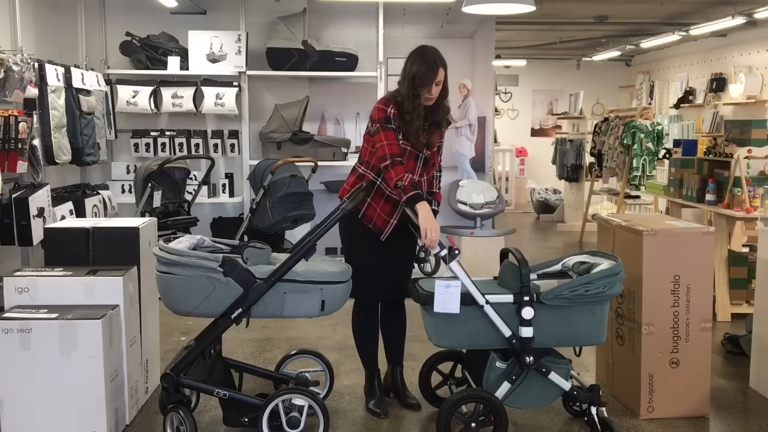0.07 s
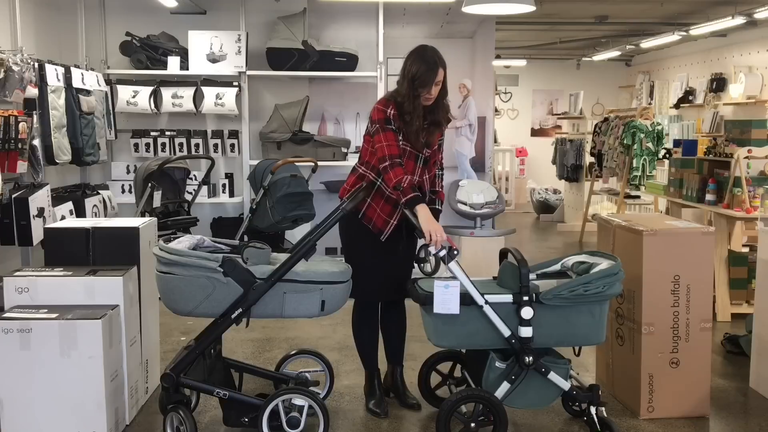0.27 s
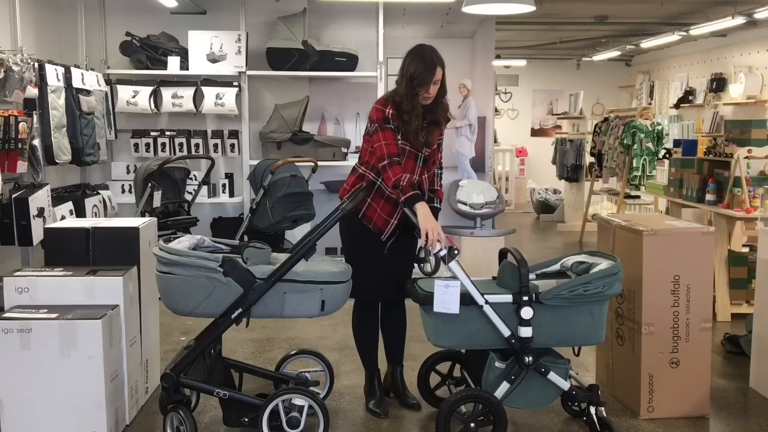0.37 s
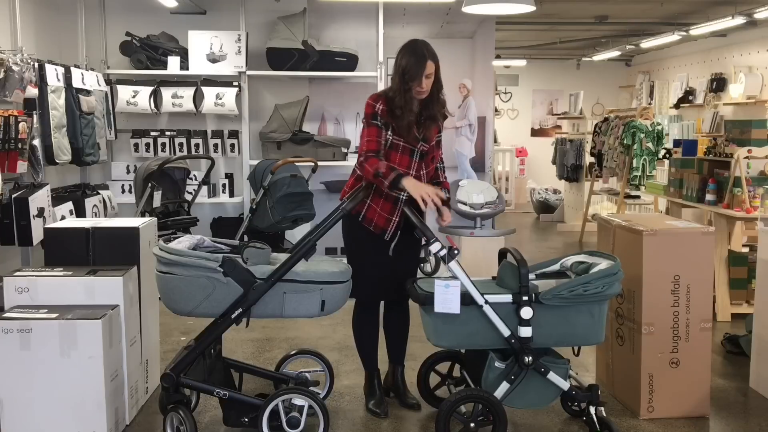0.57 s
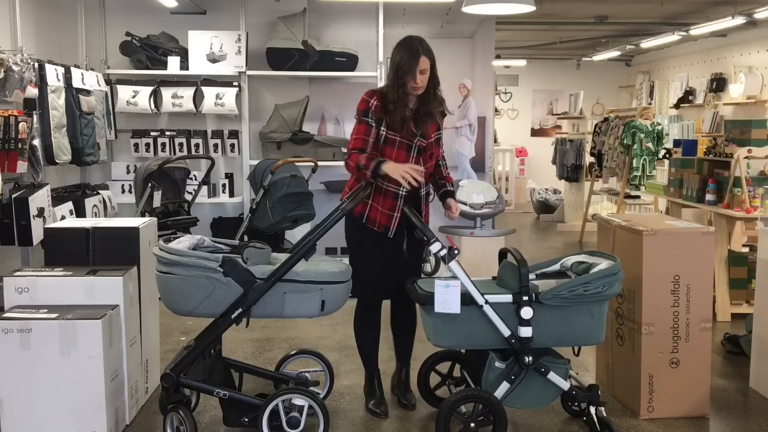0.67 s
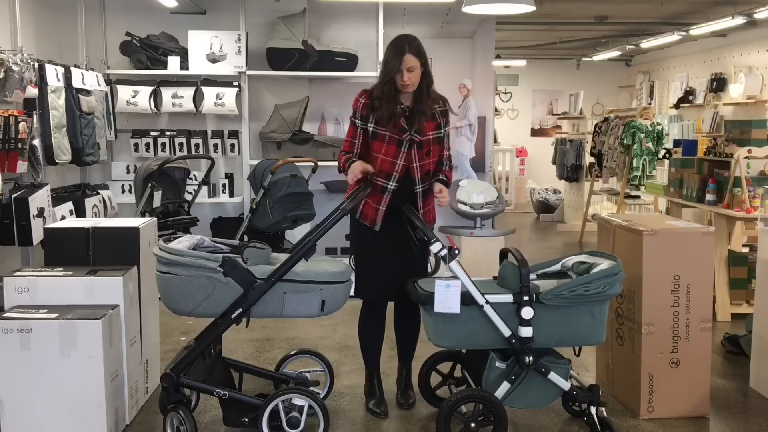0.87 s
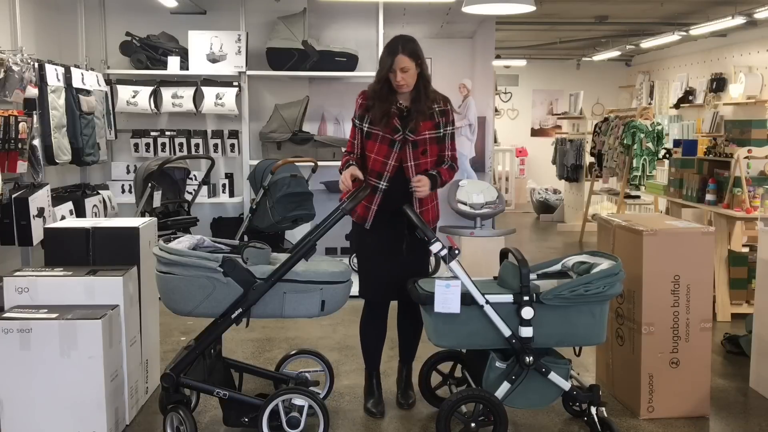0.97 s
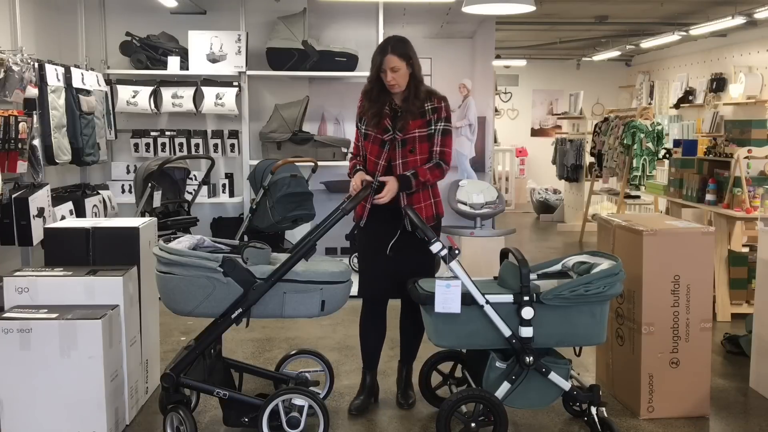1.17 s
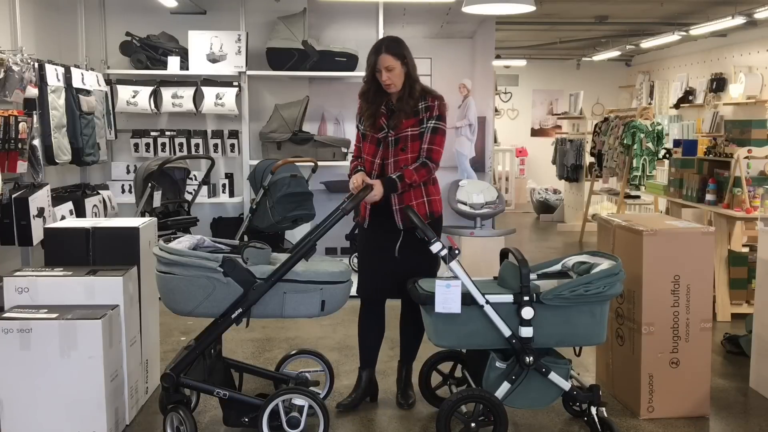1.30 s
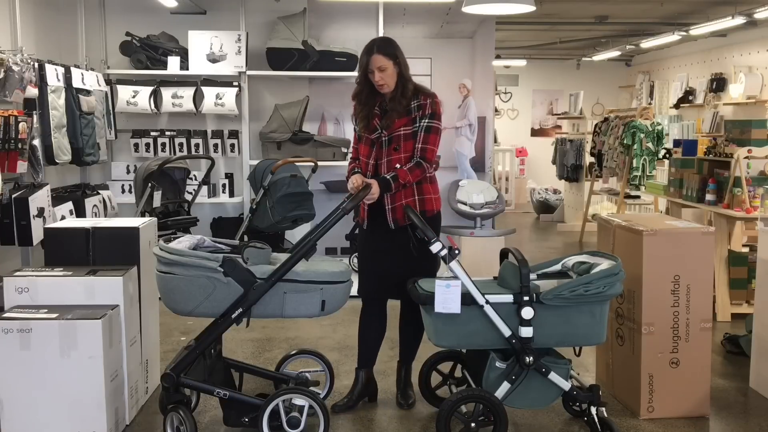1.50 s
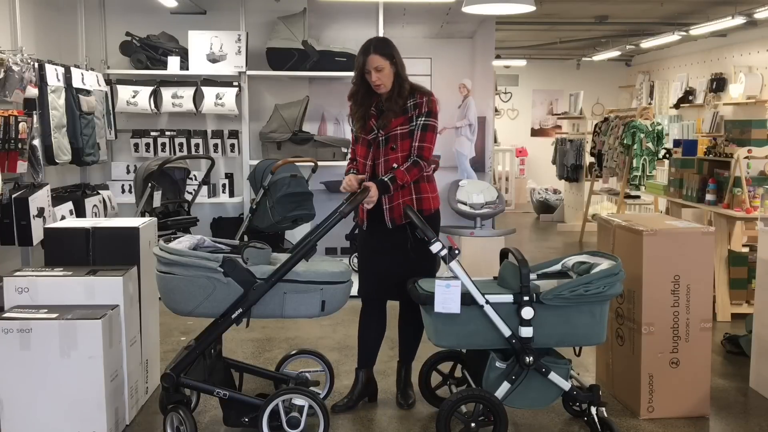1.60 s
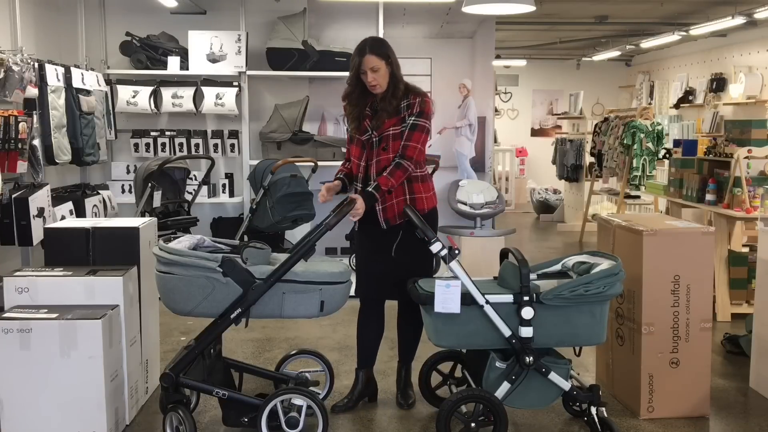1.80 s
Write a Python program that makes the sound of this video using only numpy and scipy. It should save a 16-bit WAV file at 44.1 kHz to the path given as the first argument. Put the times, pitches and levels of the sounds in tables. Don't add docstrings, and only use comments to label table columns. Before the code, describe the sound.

Loud double plastic clack of a pushchair handle lever, then faint rustle, ticks and soft frame thud

```python
import sys
import numpy as np
from scipy import signal
from scipy.fft import rfft, irfft, next_fast_len
from scipy.io import wavfile
from scipy.ndimage import uniform_filter1d

SR = 44100
rng = np.random.default_rng(int(sys.argv[2]) if len(sys.argv) > 2 else 0)


def pcm_store(signal):
    levels = np.round(np.clip(np.atleast_2d(signal), -1, 1) * 32767)
    wavfile.write(sys.argv[1], SR, levels.astype(np.int16).T)


def decibels_to_gain(level_db):
    exponent = np.asarray(level_db, float) / 20
    return 10 ** exponent


N = 81585


def unit(x):
    return x / np.sqrt(np.mean(x ** 2) + 1e-20)


def along(points, hz):
    f, v = np.transpose(points)
    return np.interp(np.log(hz + 1), np.log(f + 1), v)


def level(rows):
    s, db = np.transpose(rows)
    return decibels_to_gain(np.interp(np.arange(N) / SR, s, db))


def filtered(x, response):
    m = next_fast_len(len(x) + SR // 2)
    return irfft(rfft(x, m) * response(np.fft.rfftfreq(m, 1 / SR)), m)[:len(x)]


def peak(f, hz, width):
    return 1j * f * width / (hz * hz - f * f + 1j * f * width)


def rush(spectrum, patchy_db):
    z = signal.stft(rng.standard_normal(N), nperseg=512)[2]
    patches = uniform_filter1d(rng.standard_normal(z.shape), 6, 0)
    patches = uniform_filter1d(patches, 10, 1)
    x = signal.istft(z * decibels_to_gain(patchy_db * unit(patches)), nperseg=512)[1][:N]
    return unit(filtered(x, lambda hz: decibels_to_gain(along(spectrum, hz))))


def clicks(contacts, body, rattle_s, rattle_db):
    scatter_db, detune = 1.5, .03
    out = np.zeros(N + SR)
    t = np.arange(SR // 20) / SR
    for s, db, tilt in contacts:
        blow = decibels_to_gain(rattle_db - 60 * t / rattle_s) * rng.standard_normal(len(t))
        blow[0] = 1
        vary = rng.normal(0, scatter_db, len(body))
        bend = 1 + rng.normal(0, detune, len(body))

        def plastic(f):
            total = 0
            for k, (hz, width, gain_db) in enumerate(body):
                gain = decibels_to_gain(gain_db + vary[k] + tilt * np.log2(hz / 4000))
                total = total + (-1) ** k * gain * peak(f, hz * bend[k], width)
            return total

        ring = filtered(blow, plastic)
        out[round(s * SR):][:len(t)] += decibels_to_gain(db) * ring / np.abs(ring).max()
    return out[:N]


def clamp_opens():
    # start in seconds, peak level in dB, brightness in dB per octave.
    contacts = [
        (.2039, -10.5, -1),
        (.2046, -11, -1),
        (.2056, -6, -2),
        (.2064, -8, 3.5),
        (.2074, -28, -2.5),
        (.2114, -28.5, 2.5),
        (.2128, -21, 10.5),
    ]
    # frequency in Hz, width in Hz, level in dB.
    lever = [(1174, 510, -8), (1493, 770, -5.5), (2220, 620, -7), (3530, 530, -3.5), (4360, 340, 1),
             (5700, 410, -2), (8620, 1500, -11), (9916, 1300, -13), (12200, 1100, -9), (14500, 850, -23)]
    return clicks(contacts, lever, rattle_s=.002, rattle_db=-18)


def clamp_shuts():
    # start in seconds, peak level in dB, brightness in dB per octave.
    contacts = [
        (.2421, -2, 9.5),
        (.2427, -3.5, 1),
        (.2442, 0.5, -2),
        (.2449, -13.5, -5),
        (.2499, -6, 2),
        (.2552, -24, -6),
        (.2575, -18.5, -3.5),
        (.2615, -16.5, 8),
        (.2690, -25, 1.5),
        (.292, -20, 1.5),
    ]
    # frequency in Hz, width in Hz, level in dB.
    seat = [(270, 230, -32), (650, 400, -25), (1084, 190, -12), (2165, 200, -1.5), (3090, 250, 2),
            (4173, 620, -3), (5330, 330, 3.5), (6400, 1500, -1.5), (8800, 2200, -3.5), (12120, 1200, 0),
            (12600, 820, -1.5), (14990, 2300, -18.5)]
    return clicks(contacts, seat, rattle_s=.002, rattle_db=-18)


def release_ticks():
    # start in seconds, peak level in dB, brightness in dB per octave.
    contacts = [(.181, -56, 7), (.1955, -46, -4), (.198, -53, -1), (1.4172, -52.5, -15),
                (1.468, -55.5, -5.5), (1.5225, -50, -6), (1.6118, -53.5, 2), (1.6195, -41, -14),
                (1.6382, -41.5, -4), (1.648, -68, -2), (1.6642, -41, -9.5), (1.6672, -43, -5),
                (1.6745, -31, -9), (1.682, -53, 0), (1.691, -52, -2), (1.72, -63, -4)]
    # frequency in Hz, width in Hz, level in dB.
    button = [(1030, 1700, -5), (2200, 430, 1), (3480, 690, 7), (5500, 2000, -10), (9610, 2000, -11.5),
              (13000, 3000, -23)]
    return clicks(contacts, button, rattle_s=.014, rattle_db=-5)


def thuds():
    # start in seconds, level in dB.
    knocks = [
        (1.642, -38.5),
        (1.6535, -40.5),
        (1.673, -28),
        (1.706, -27),
        (1.745, -60),
        (1.786, -60),
        (1.825, -43),
    ]
    # frequency in Hz, level in dB, T60 in seconds.
    frame = [(168.2, 9.5, 0.059), (194, -2, 0.061), (319, -3, 0.085), (453, -6, 0.034), (673, -9.5, 0.028),
             (875, -20, 0.098), (1157, -9, 0.034)]
    rise_s = .012
    out = np.zeros(N + SR)
    t = np.arange(SR // 4) / SR
    for s, db in knocks:
        ring = 0
        for hz, gain_db, t60 in frame:
            decay = decibels_to_gain(gain_db + rng.normal(0, 1) - 60 * t / t60)
            ring = ring + decay * np.sin(2 * np.pi * hz * t)
        out[round(s * SR):][:len(t)] -= decibels_to_gain(db) * ring * (1 - np.exp(-t / rise_s))
    return out[:N]


def friction():
    # time in seconds, level in dB.
    sleeve = [(.35, -90), (.6, -69), (.76, -68.5), (.82, -82), (.99, -87.5), (1.03, -68), (1.065, -64.5),
              (1.12, -71.5), (1.2, -78), (1.43, -80), (1.47, -74.5), (1.5, -95.5), (1.6, -82)]
    # frequency in Hz, density in dB per Hz.
    cloth = [(800, -34), (2500, -3), (5000, -2), (9000, -6), (12500, -15), (16000, -14.5)]
    # time in seconds, level in dB.
    tube = [(1.6, -94.5), (1.655, -71), (1.668, -53.5), (1.75, -56), (1.795, -51.5), (1.85, -53)]
    # frequency in Hz, density in dB per Hz.
    slide = [(500, -34), (1200, -10), (2500, -7.5), (4000, -7.5), (5400, -1), (7000, -6), (9700, -9),
             (10500, -18), (16000, -15.5)]
    grit = decibels_to_gain(0.84 * unit(uniform_filter1d(rng.standard_normal(N), size=60)))
    rustle = level(sleeve) * rush(cloth, patchy_db=1.2)
    hiss = level(tube) * rush(slide, patchy_db=1.2)
    return grit * (rustle + hiss)


def shop(x, wet_db):
    # frequency in Hz, T60 in seconds.
    decay = [(300, .4), (1000, 0.53), (2200, 0.44), (4000, 0.48), (8000, 0.32), (14000, 0.31)]
    # frequency in Hz, level in dB.
    colour = [(500, 0.5), (1200, -2.5), (2500, 4), (5000, -2), (9000, -1.5), (12000, -3), (15600, -3),
              (16000, -25.5)]
    late_db, late_t60_s = -25.5, 1
    first_wall_s = .0022
    hz, t, z = signal.stft(rng.standard_normal(SR), SR, nperseg=256)
    fall = decibels_to_gain(-60 * t / along(decay, hz)[:, None]) + decibels_to_gain(late_db - 60 * t / late_t60_s)
    tail = signal.istft(z * fall * decibels_to_gain(along(colour, hz))[:, None], SR, nperseg=256)[1]
    tail = np.pad(tail / np.linalg.norm(tail), (round(first_wall_s * SR), 0))
    return x + decibels_to_gain(wet_db) * signal.fftconvolve(x, tail)[:N]


def ventilation():
    # frequency in Hz, density in dB per Hz.
    air_colour = [(44, -46), (80, -9.5), (200, -14), (480, -20), (1000, -21.5), (2200, -29), (3200, -37.5),
                  (16500, -55.5)]
    # time in seconds, rumble level in dB.
    swells = [(0.0, -37), (0.024, -53), (0.396, -59.5), (0.432, -49), (0.546, -44.5), (0.978, -55),
              (0.994, -55.5), (1.226, -47), (1.35, -44.5), (1.374, -58.5), (1.458, -44), (1.54, -56.5),
              (1.668, -46.5), (1.704, -51), (1.776, -42), (1.85, -49)]
    duct_hz, duct_width_hz = 51.7, 12
    hum_hz, hum_width_hz = 147.35, 2.7
    rumble = unit(filtered(rng.standard_normal(N), lambda f: peak(f, duct_hz, duct_width_hz) ** 2))
    rumble = rumble / np.sqrt(np.abs(uniform_filter1d(rumble ** 2, size=2600)) + .05)
    hum = unit(filtered(rng.standard_normal(N), lambda f: peak(f, hum_hz, hum_width_hz) ** 2))
    air = rush(air_colour, patchy_db=.8)
    return decibels_to_gain(-57.5) * air + level(swells) * rumble + decibels_to_gain(-62) * hum


def street():
    # time in seconds, level in dB.
    traffic = [(0.0, -54), (0.11, -61), (0.212, -56), (0.254, -57), (0.288, -60.5), (0.778, -55.5),
               (0.81, -62), (0.85, -55), (1.402, -58.5), (1.466, -52), (1.546, -59), (1.6, -55.5)]
    # frequency in Hz, density in dB per Hz.
    tyres = [(50, -17), (90, 11), (150, 1), (230, 0), (340, 0), (450, -34.5)]
    return level(traffic) * rush(tyres, patchy_db=.8)


def scene():
    clamp = shop(clamp_opens(), wet_db=-0.5) + shop(clamp_shuts(), wet_db=-4.5)
    handle = shop(release_ticks(), wet_db=-1) + shop(thuds(), wet_db=-9.5)
    return (clamp + handle + friction() + ventilation() + street())[None]


def top_cut(x):
    return signal.sosfilt(signal.butter(12, 16780, fs=SR, output="sos"), x)


def record(dry):
    ceiling, top_hz = .98, 15800
    x = dry[0] / (1 + np.abs(dry[0] / ceiling) ** 6) ** (1 / 6)
    mix = filtered(x, lambda hz: 1 / (1 + (hz / top_hz) ** 60))[None]
    return top_cut(mix)


dry = scene()
out = record(dry)
pcm_store(out)
```